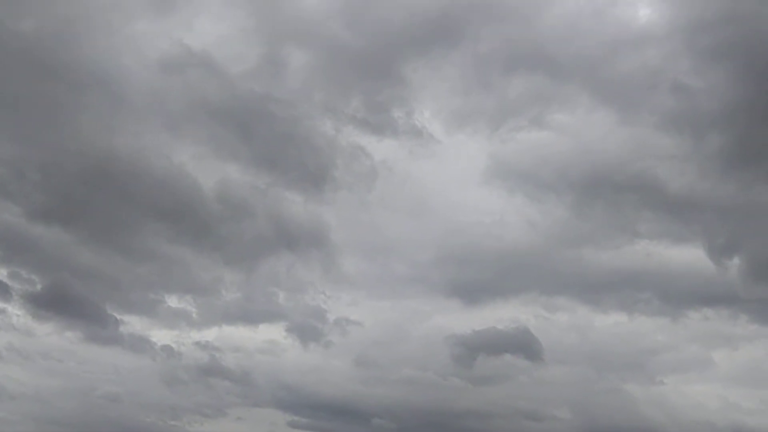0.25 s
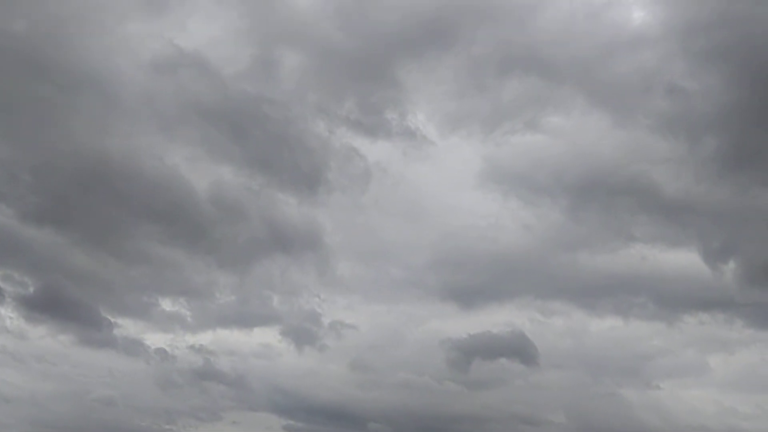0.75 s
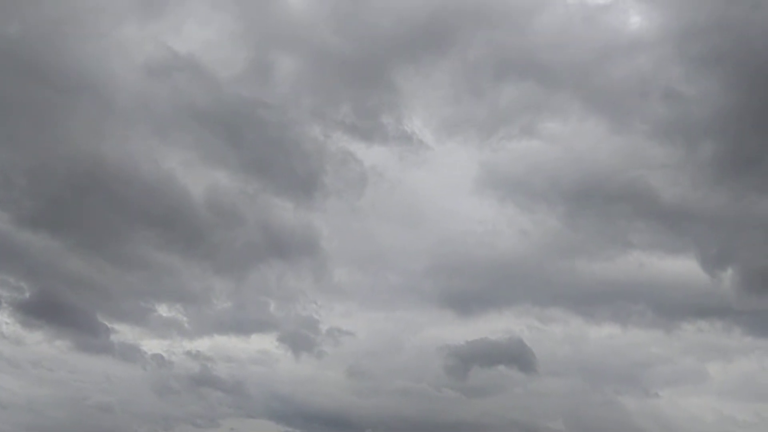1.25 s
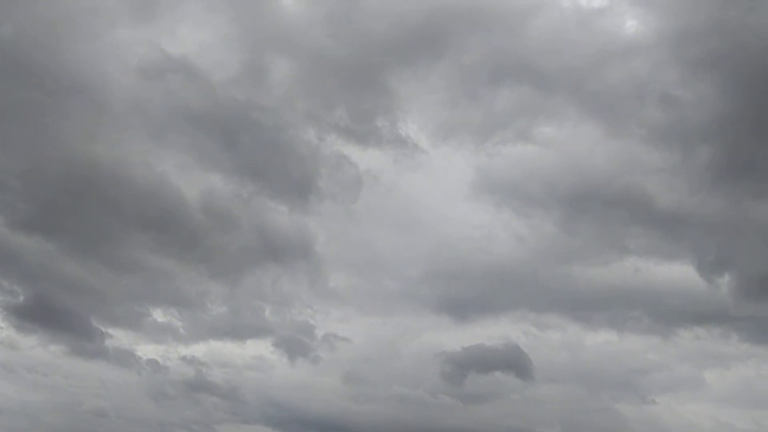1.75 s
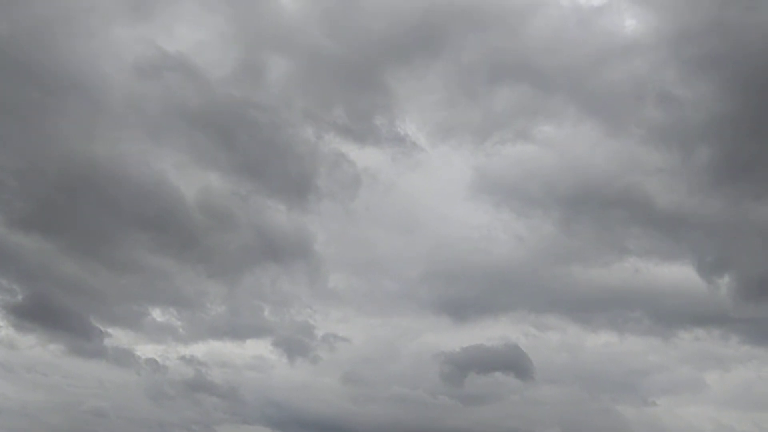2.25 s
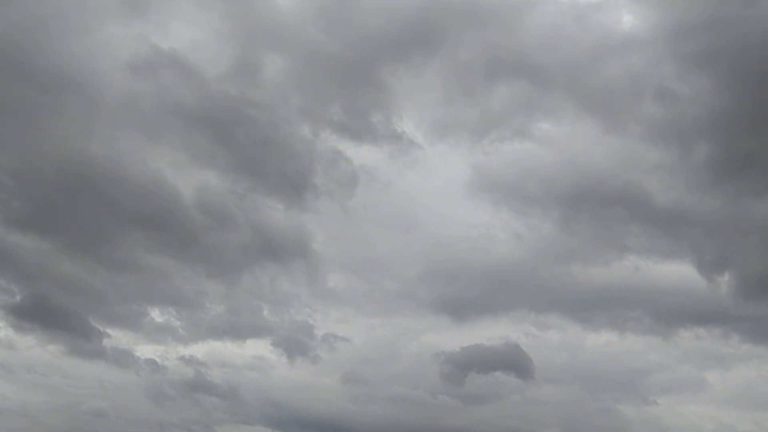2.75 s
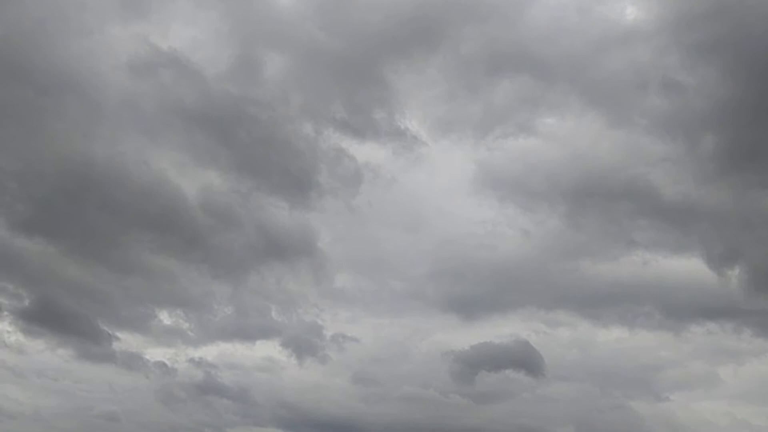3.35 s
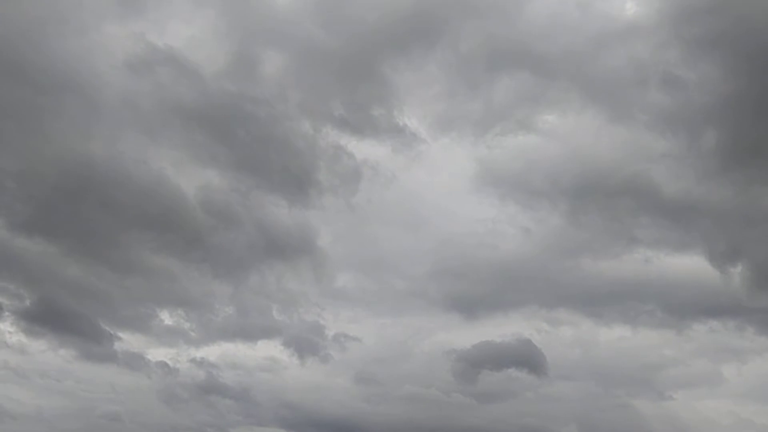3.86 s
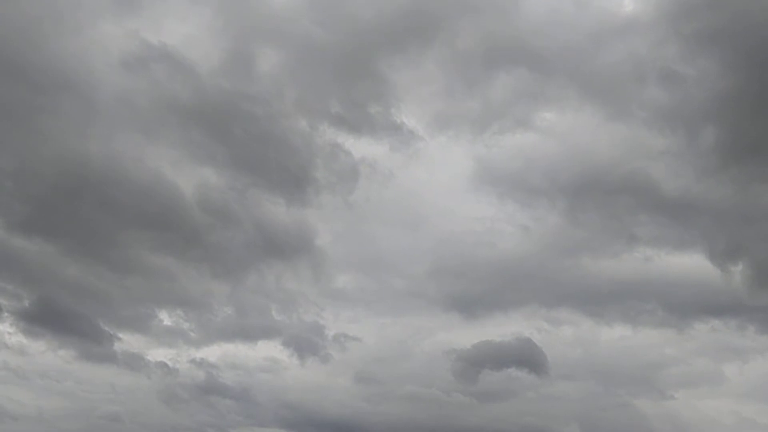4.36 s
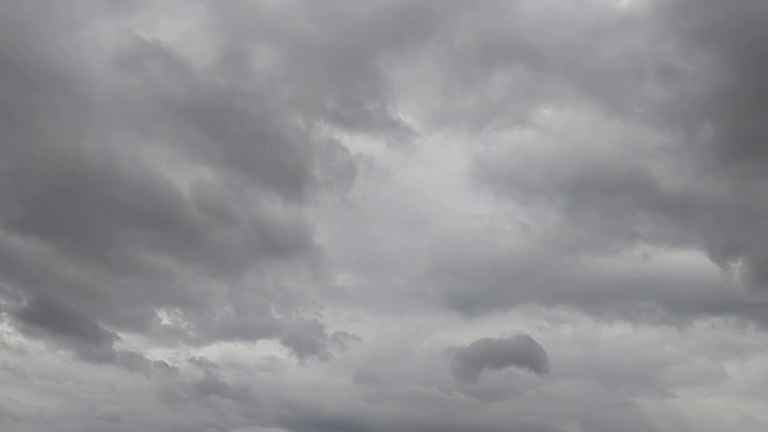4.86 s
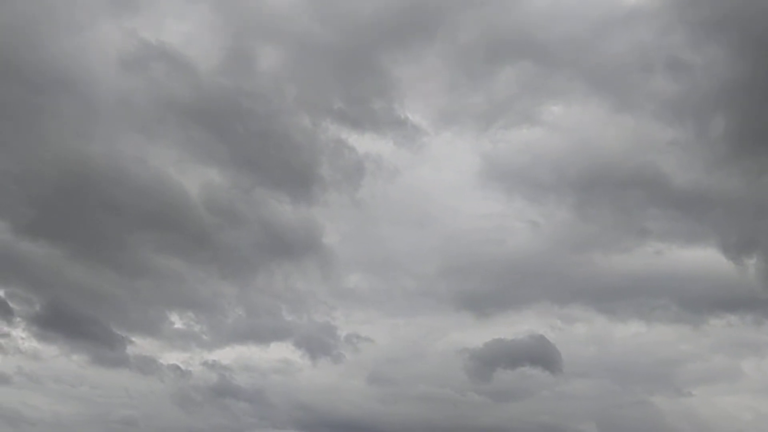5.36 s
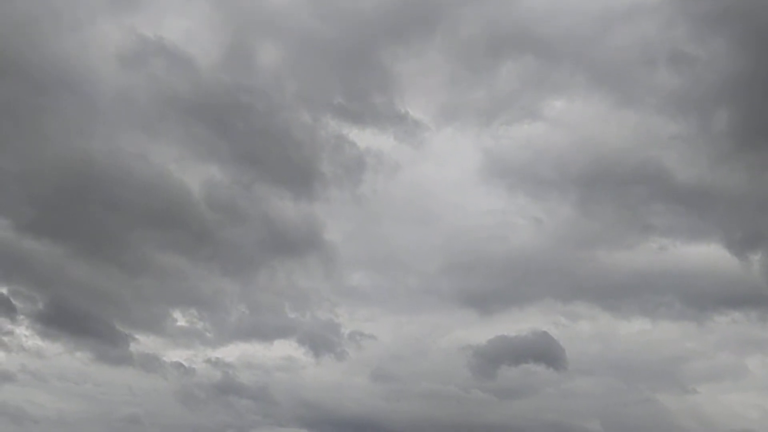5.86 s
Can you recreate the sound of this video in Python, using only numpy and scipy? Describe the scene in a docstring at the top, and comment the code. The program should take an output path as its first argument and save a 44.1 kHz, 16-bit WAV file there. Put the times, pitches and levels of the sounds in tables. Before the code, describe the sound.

Wind buffets the microphone in two big gusts, swelling and fading with a softer lull between, over a faint far-off hum.

```python
"""Wind gusts over a single outdoor microphone: two big gusts with a soft swell between them.
The airflow hisses across the port, and its eddies rumble and flutter on the diaphragm.
In the big gusts, shoves of pressure overload the microphone, which thumps and chokes the hiss.
Behind the wind lie the open air, a faint far engine and a thin whistle before the second gust."""
import sys
import numpy as np
from scipy import signal
from scipy.fft import rfft, irfft, next_fast_len
from scipy.io import wavfile
from scipy.ndimage import uniform_filter1d, map_coordinates

SR = 44100
rng = np.random.default_rng(int(sys.argv[2]) if len(sys.argv) > 2 else 0)


def master(y):
    """Save y as 16-bit WAV."""
    cut = np.clip(np.atleast_2d(y).T, -1, 1)
    pcm = np.round(cut * 32767)  # scale
    wavfile.write(sys.argv[1], SR, pcm.astype(np.int16))


N = 268745


def amp(db):
    """Decibels to gain."""
    return 10 ** (np.asarray(db) / 20)


def unit(x):
    """Scale to rms 1."""
    return x / np.sqrt(np.mean(x ** 2) + 1e-20)


def clock():
    """The time of every sample in seconds."""
    return np.arange(N) / SR


def wobble(rate):
    """A smooth random curve through rate points a second."""
    return map_coordinates(rng.standard_normal(int(N * rate / SR) + 4), [clock() * rate])


def swell(peak, length, attack=0.5):
    """A smooth rise to 1 and fall back to 0; the rise takes the attack share of the length."""
    t = clock() - peak
    part = t / (length * np.where(t < 0, attack, 1 - attack))
    return np.cos(np.pi / 2 * np.clip(part, -1, 1)) ** 2


def filtered(x, response):
    """Filter x with a gain given as a function of frequency."""
    size = next_fast_len(N + SR // 2)
    gain = response(np.fft.rfftfreq(size, 1 / SR))
    return irfft(rfft(x, size) * gain, size)[..., :N]


def coloured(x, spectrum):
    """EQ x through (Hz, dB) points on a log axis, then scale to rms 1."""
    points_hz, db = np.transpose(spectrum)
    return unit(filtered(x, lambda hz: amp(np.interp(np.log(hz + 1), np.log(points_hz + 1), db))))


def noise(spectrum):
    """Steady coloured noise of rms 1."""
    return coloured(rng.standard_normal(N), spectrum)


def patchy_noise(spectrum, patchy_db):
    """Noise of rms 1 whose colour shifts in short random patches."""
    bins = signal.stft(rng.standard_normal(N), nperseg=512)[2]
    field = uniform_filter1d(rng.standard_normal(bins.shape), size=14, axis=0)  # smooth in frequency
    field = uniform_filter1d(field, size=10, axis=1)  # and in time
    patches = signal.istft(bins * amp(patchy_db * unit(field)), nperseg=512)[1][:N]
    return coloured(patches, spectrum)


def open_air():
    """The steady, bass-heavy bed of the open air far away."""
    # Colour of the bed. Each row: frequency in Hz, relative level in dB.
    air_eq = [(8, -3.5), (20, -8.5), (35, 1.5), (55, -1.5), (70, -13.5), (110, -30), (200, -22), (300, -27),
              (500, -27.5), (1000, -30), (2000, -33), (4000, -41.5), (8000, -46), (16000, -66)]
    return amp(-39.5) * noise(air_eq)


def engine():
    """A far engine hums at nearly steady speed; the moving air makes each order waver."""
    # Engine orders. Each row: multiple of the shaft rate, level in dB.
    orders = [(4, -58), (5, -64.5), (8, -46.5), (9, -73), (10, -65), (12, -66.5), (13, -66), (16, -72),
              (17, -73.5)]
    shaft_hz, waver_db = 33.98, 1.0
    turns = np.cumsum(shaft_hz * (1 + 0.0012 * wobble(4.13))) / SR
    hum = np.zeros(N)
    for order, db in orders:
        phase = 2 * np.pi * (order * turns + rng.random())
        hum += amp(db + waver_db * wobble(5.25)) * np.sqrt(2) * np.sin(phase)
    return hum


def whistle():
    """Two thin, unsteady tones fade in and out in the lull before the second gust."""
    # Whistle tones. Each row: start in seconds, end in seconds, pitch in Hz, peak level in dB.
    tones = [(3.72, 4.12, 4040, -59), (3.76, 3.97, 14400, -53)]
    sound = np.zeros(N)
    for start, end, hz, db in tones:
        phase = 2 * np.pi * np.cumsum(hz * (1 + 0.00406 * wobble(200))) / SR
        sound += amp(db) * swell((start + end) / 2, end - start) * np.sin(phase)
    return sound


def wind_db(lead_s=0):
    """The strength of the wind across the port at every sample, looking lead_s seconds ahead."""
    # Contour of the gusts. Each row: time in seconds, wind strength in dB.
    gusts = [(0.0, -54), (0.34, -54.5), (0.44, -59.5), (0.65, -57.5), (0.96, -41.5), (1.33, -26.2),
             (1.48, -29), (1.62, -25), (1.8, -33), (2.03, -32.5), (2.35, -40), (3.04, -43), (3.09, -38.5),
             (3.39, -35.5), (3.69, -37), (3.94, -47), (4.1, -40), (4.31, -40.5), (4.36, -33), (4.61, -27),
             (4.67, -20.5), (4.73, -25), (4.83, -21.5), (5.04, -29), (5.19, -28), (5.55, -34.5),
             (5.91, -39.5), (6.09, -33)]
    times, db = np.transpose(gusts)
    return np.interp(clock() + lead_s, times, db)


def buffeting():
    """Gains of the rumble, which follows the wind, and of the flutter; each puff adds power to both."""
    # Puffs that strike the microphone. Each row: peak time in seconds, length in seconds,
    # rumble level in dB, flutter level in dB.
    puffs = [(0.797, 0.39, -31, -50.5), (1.284, .22, -15, -29), (1.379, 0.25, -12, -30),
             (1.581, 0.19, -17, -26.5), (1.702, 0.2, -18, -36), (2.085, 0.55, -31, -58),
             (4.013, 0.36, -28, -43), (4.28, 0.86, -30.5, -62), (4.595, 0.46, -20, -42),
             (4.88, 0.46, -28.5, -62), (5.7, 0.1, -27.5, -55), (6.05, 0.52, -25.5, -38.5)]
    breeze_db, breeze_rumble_db, flutter_floor_db = -40, -40, -54.5
    over_breeze_db = wind_db(lead_s=0.21) - breeze_db  # a gust's turbulent front arrives before its hiss
    rumble_gain = amp(breeze_rumble_db + 0.51 * over_breeze_db)
    flutter_gain = amp(flutter_floor_db)
    for peak, length, rumble_db, flutter_db in puffs:
        puff = swell(peak, length, attack=0.38)
        rumble_gain = np.hypot(rumble_gain, amp(rumble_db) * puff)
        flutter_gain = np.hypot(flutter_gain, amp(flutter_db) * puff)
    return rumble_gain, flutter_gain


def shoves():
    """The strongest eddies hit the diaphragm fast and let go more slowly: their pressure and hold (0-1)."""
    # Shoves and sucks of air. Each row: peak time in seconds, length in seconds,
    # signed pressure with 1 as full scale.
    hits = [(1.26, 0.042, -0.49), (1.296, .052, 0.96), (1.362, 0.052, -0.58), (1.401, 0.048, -1.05),
            (1.434, 0.093, 1.78), (4.552, .06, -0.74), (4.6, 0.0554, 0.87)]
    envelopes = np.array([swell(peak, length, attack=0.308) for peak, length, _ in hits])
    pressures = np.array(hits)[:, -1]
    return pressures @ envelopes, envelopes.max(axis=0)


def eddies():
    """Large eddies rumble and sway the diaphragm until a shove takes over; small ones flutter in bursts."""
    # Colours of the large eddies, the small eddies and the pressure swings below hearing.
    # Each row: frequency in Hz, relative level in dB.
    rumble_eq = [(8, 3.5), (15, -21), (25, 14.5), (40, -6.5), (55, -2.5), (75, -11.5), (110, -14),
                 (200, -43), (500, -92)]
    flutter_eq = [(40, -11), (80, -15.5), (130, 4.5), (200, -1), (300, -6), (450, -14), (650, -23.5),
                  (1200, -36), (3000, -80)]
    sway_eq = [(0, -9), (2, -1), (5, -8), (9, -11), (15, -19), (25, -66), (60, -82)]
    rumble_gain, flutter_gain = buffeting()
    rumble = rumble_gain * noise(rumble_eq)
    bursts = amp(2.9 * wobble(55))
    flutter = flutter_gain * unit(bursts * noise(flutter_eq))
    sway = 0.25 * np.tanh(amp(25) * rumble_gain * noise(sway_eq))
    push, hold = shoves()
    return push + (1 - hold) * (rumble + sway) + flutter


def airflow():
    """Faster air across the port is louder and brighter: the hiss grows more steeply than the rush."""
    # Colours of the port's hiss and of the lower, softer rush of air.
    # Each row: frequency in Hz, relative level in dB.
    hiss_eq = [(1500, -28), (3000, -25.5), (4000, -12), (5300, -7.5), (5800, -13.5), (6600, -6),
               (8400, -1.5), (9600, -3.5), (11000, -5.5), (12900, 0.5), (14300, -0.5), (15700, 0.94)]
    rush_eq = [(200, -7.5), (500, -13), (900, -7.5), (1350, -5.5), (2000, -0.5), (3200, -2), (4000, -6.5),
               (6000, -7), (10000, -45)]
    # Turbulence that roughens the stream. Each row: changes per second, depth in dB.
    turbulence = [(25, 0.66), (170, 0.7)]
    flow_db = wind_db() + sum(depth_db * wobble(rate) for rate, depth_db in turbulence)
    hiss = amp(flow_db + 4.0) * patchy_noise(hiss_eq, patchy_db=0.5)
    rush = amp(0.91 * flow_db - 12.5) * patchy_noise(rush_eq, patchy_db=0.5)
    return hiss + rush


def scene():
    """Everything meets at one diaphragm, so both channels are alike."""
    pressure = open_air() + airflow() + eddies() + whistle() + engine()
    return np.array([pressure, pressure])


def record(dry):
    """The microphone saturates, flattening whatever rides on a big shove; then the top treble is cut."""
    ceiling, hardness, top_hz = 0.71, 24, 15850
    clipped = dry / (1 + np.abs(dry / ceiling) ** hardness) ** (1 / hardness)
    return filtered(clipped, lambda hz: hz < top_hz)


dry = scene()
out = record(dry)
master(out)
```